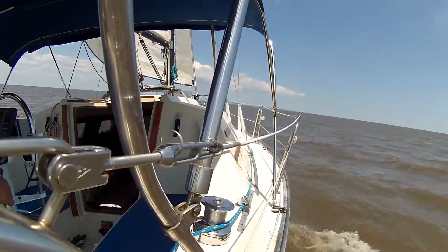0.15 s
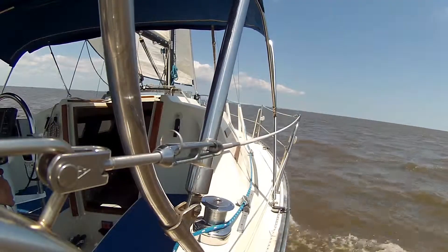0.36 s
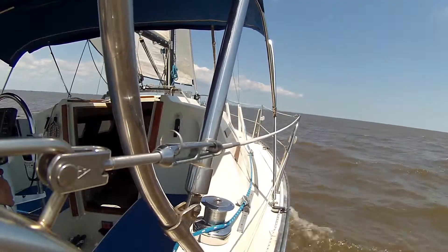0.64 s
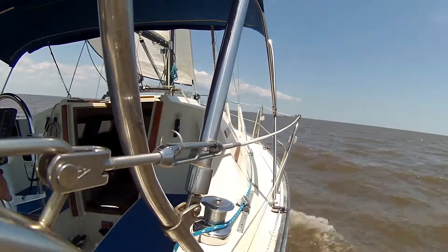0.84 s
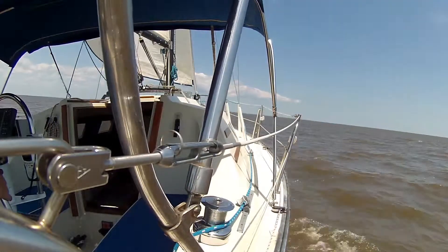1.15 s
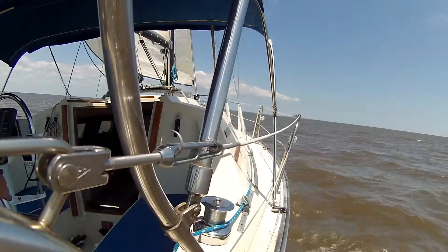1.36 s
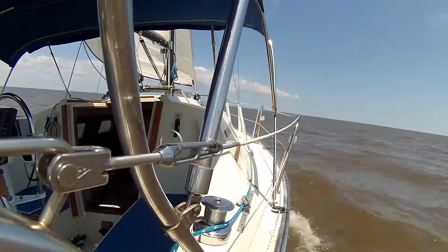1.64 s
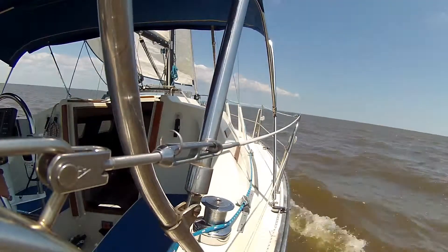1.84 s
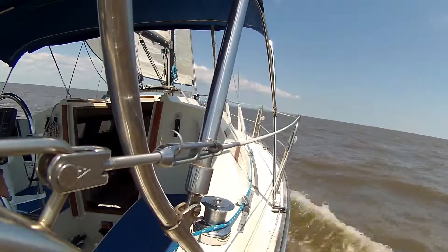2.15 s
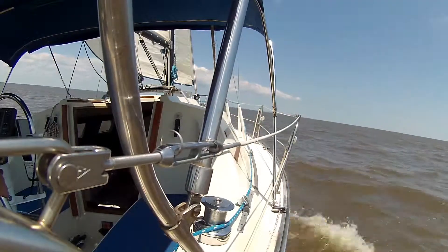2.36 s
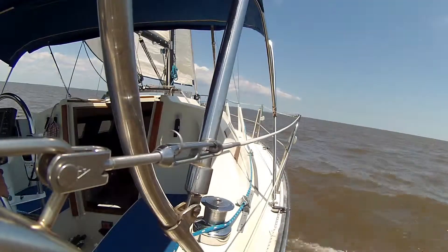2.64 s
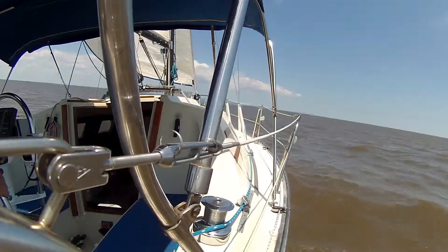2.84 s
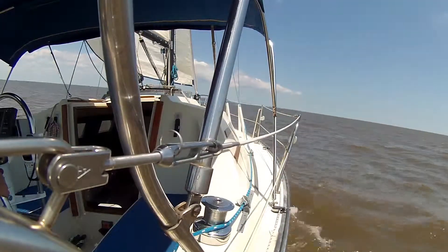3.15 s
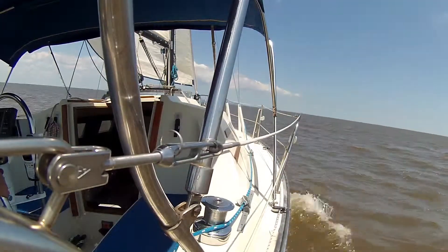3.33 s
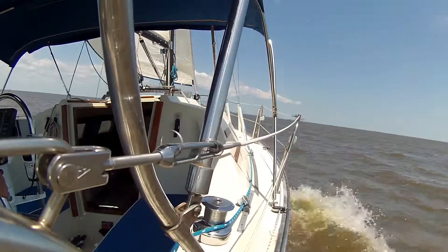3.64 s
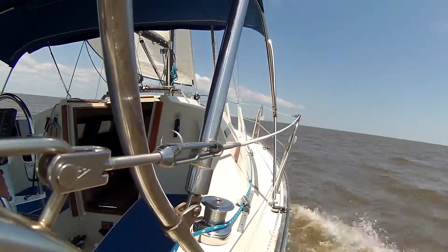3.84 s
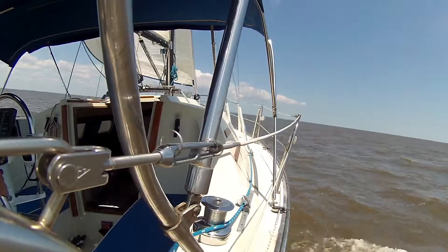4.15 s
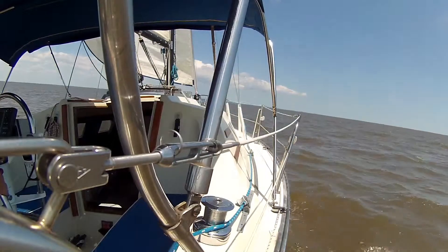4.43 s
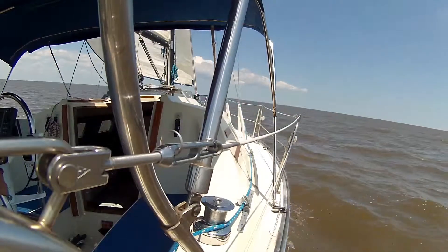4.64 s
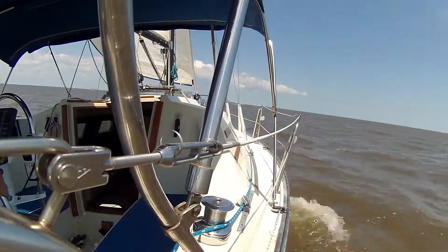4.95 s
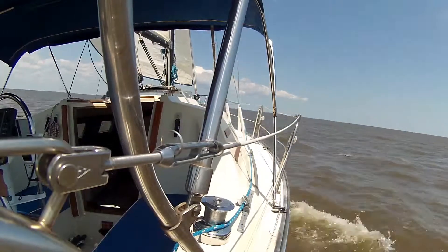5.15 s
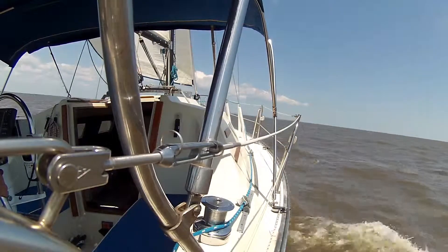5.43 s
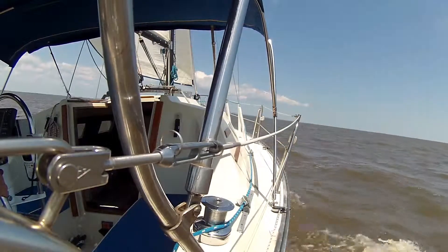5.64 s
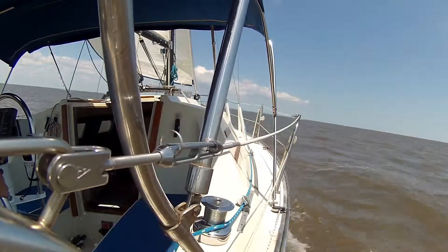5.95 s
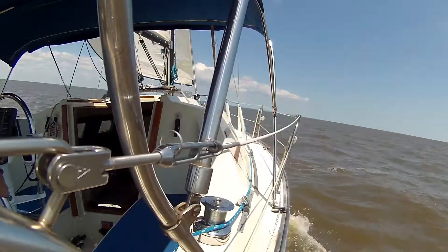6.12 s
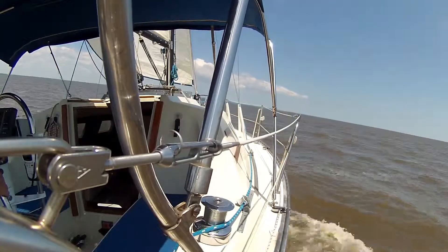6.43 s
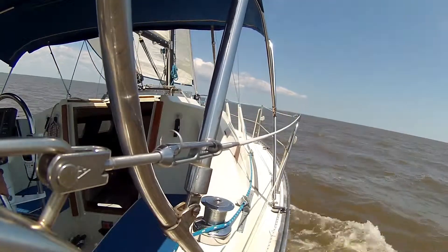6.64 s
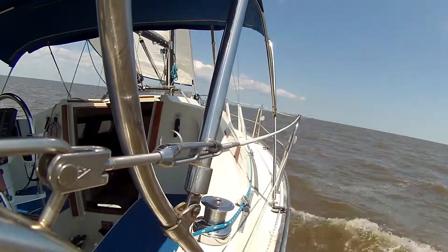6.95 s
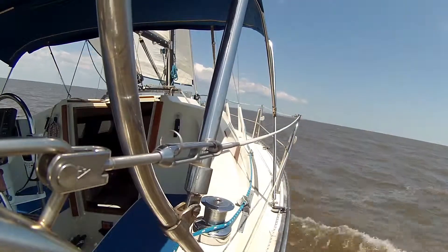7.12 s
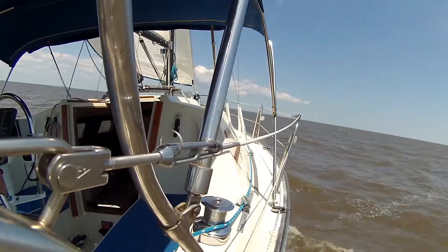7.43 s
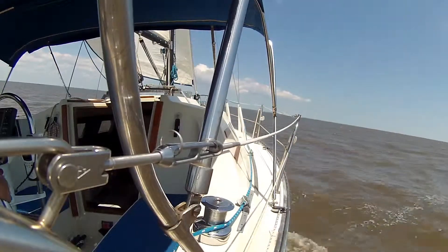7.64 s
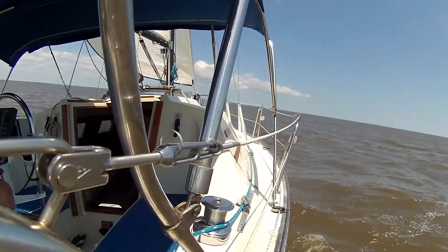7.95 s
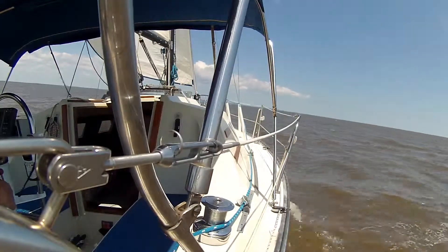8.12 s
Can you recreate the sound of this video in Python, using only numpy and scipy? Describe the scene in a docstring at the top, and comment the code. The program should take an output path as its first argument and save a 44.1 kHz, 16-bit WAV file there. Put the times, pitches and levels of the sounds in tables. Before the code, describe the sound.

Water rushes and gurgles along a sailboat's hull for about eight seconds, sounding hollow through a cased microphone on the stern rail. Bubbles plink throughout, light spray hisses, and a deep, lumpy rumble swells underneath, most strongly between 4 and 5 seconds. Choppy waves jolt the hull with dull thumps at about 0.6, 1.8, 4, 4.7 and 7.8 seconds, setting the rail and a wire ringing low. The rigging hums in gusts, strongest from 2 to 3.3 seconds and again from 5.6 to the end, with a higher hum joining at times. The wash surges with splashes around 2.5, 3.9 and 5.4 seconds, and two waves slap the hull near 7 seconds with a burst of bubbling. One brief, faint high squeak comes at 2.4 seconds, and a few drops tick close by over a thin steady hiss.

```python
"""Water rushes and gurgles along a heeling sailboat, heard from a cased microphone on the stern rail.
The wash and its bubbles ring the rail and case, spray hisses, and a deep, lumpy rumble swells beneath.
Choppy waves jolt, thump and later slap the hull; a stay rings with the jolts and hums in the gusts.
There is one brief high squeak, and a few drops tick close by.
The one microphone feeds two channels, each with its own hiss."""
import sys
import numpy as np
from scipy import signal
from scipy.fft import rfft, irfft
from scipy.io import wavfile

SR = 44100
rng = np.random.default_rng(int(sys.argv[2]) if len(sys.argv) > 2 else 0)


def wav_out(sig):
    """Save sig, one row per channel (or a flat mono array), as 16-bit PCM at SR to the path in sys.argv[1]."""
    wavfile.write(sys.argv[1], SR, np.round(np.clip(np.atleast_2d(sig).T, -1, 1) * 32767).astype(np.int16))


N = 365148

# steady flow along the hull: t/s, low gurgle/dB, high rush/dB, spray/dB
FLOW = [(0, -52, -51, -68), (.6, -51, -52.5, -70), (1.05, -50.5, -53, -70), (1.45, -53, -57, -69.5),
        (1.65, -55, -53, -69), (2.1, -55, -53, -70), (2.9, -54, -55, -72), (3.4, -53, -52.5, -70),
        (4.05, -50, -51, -67), (4.4, -52.5, -53.5, -71), (5.0, -53, -51.5, -70), (5.7, -52, -53, -68),
        (6.2, -55, -53.5, -68), (6.75, -54, -51, -69), (7.2, -54, -49.5, -70), (7.45, -54, -52.5, -70),
        (7.85, -53, -56.5, -72), (8.28, -53, -55, -73)]
# water lapping low on the hull: peak t/s, gurgle/dB
LAPS = [(.25, -46.5), (.34, -47.5), (.6, -47), (.91, -47), (1.18, -47), (1.29, -47.5), (1.38, -47.5),
        (1.77, -47), (2.74, -49), (3.48, -48), (3.74, -45.5), (3.89, -45), (4.47, -49.5), (4.54, -49),
        (5.09, -48), (5.19, -44), (5.28, -43), (5.4, -43), (5.51, -47.5), (5.58, -47), (5.63, -45),
        (5.76, -48.5), (5.9, -49.5), (6.27, -50), (6.8, -48), (6.97, -44), (7.03, -46), (7.39, -49),
        (7.54, -50), (7.86, -46), (8.09, -50), (8.26, -47)]
# the bow wave breaking: peak t/s, rush/dB, spray/dB, build-up over 20 dB/s
BOW_SPLASHES = [(.09, -50, -65, .3), (.24, -49.5, -66, .3), (.37, -48.5, -70, .1), (1.75, -49.5, -69, .1),
                (2.33, -50, -63.5, .6), (2.44, -50.5, -64, .5), (2.6, -49, -60, .6), (2.76, -52, -66, .5),
                (3.11, -54, -68, .2), (3.42, -53, -65, .6), (3.55, -50.5, -70, .1), (3.74, -48, -67, .25),
                (3.88, -44.5, -62, .6), (3.97, -48.5, -60, .5), (4.3, -51, -65.5, .6),
                (4.55, -50, -64.5, .12), (5.05, -51, -64, .3), (5.14, -49, -65, .3), (5.36, -46, -69, .4),
                (5.49, -51, -60.5, .2), (5.54, -52, -61, .1), (5.78, -49, -67, .4), (6.13, -53, -66, .3),
                (6.64, -52, -64, .7), (6.8, -47.5, -67, .2), (6.95, -49, -60, .1), (7.1, -47, -63, .12),
                (7.25, -48, -65, .4), (7.37, -49, -62, .4), (7.98, -56, -67, .25)]
# modes of the rail and microphone case: f/Hz, width/Hz, gain/dB
CASE_MODES = [(414, 109, 4.5), (621, 120, 0.5), (713, 59, 8.5), (768, 50, 1.5), (988, 262, -2.5),
              (1294, 189, 3.5), (1442, 325, -1.5), (1910, 370, -9.5), (2222, 185, -6), (2626, 360, -12),
              (3090, 136, -16), (3650, 1740, -25.5)]
# spectrum of the spray: f/Hz, relative density/dB
SPRAY_SPECTRUM = [(2500, -5), (3500, 0.5), (5500, -7), (6500, -2), (7100, -7), (8000, 3.5), (9000, -7.5),
                  (10500, -12), (12500, -37.5), (15000, -33)]
# waves jolting the hull, and each part's share: peak t/s, stay/dB, rail/dB, panels/dB
JOLTS = [(.07, -43.5, -56, -45), (.26, -54, -33, -38), (.38, -47, -33, -41), (.51, -24.5, -40, -44),
         (.6, -24.5, -32, -38), (.88, -48, -39, -41.5), (.94, -42, -35, -46), (1.08, -34, -33, -48),
         (1.17, -35, -32.5, -41), (1.38, -40, -32.5, -36.5), (1.57, -52, -38, -46), (1.7, -34, -36.5, -47),
         (1.8, -24.5, -34, -39.5), (1.96, -38, -33.5, -45), (2.21, -50, -37, -49), (2.6, -50, -42, -48),
         (2.9, -50, -36.5, -48), (3.0, -50, -38, -48), (3.2, -50, -35.5, -47), (3.29, -48, -34, -47),
         (3.36, -36, -34.5, -47), (3.6, -35, -43, -47), (3.71, -52, -37.5, -47), (3.85, -41, -37, -44),
         (4.01, -36, -29.5, -42.5), (4.15, -32.5, -34, -42.5), (4.44, -39, -33, -46), (4.72, -34, -36, -36),
         (4.99, -44, -40.5, -45), (5.12, -44, -43, -44), (5.26, -44, -40, -43.5), (5.38, -50, -42.5, -43),
         (5.53, -45, -52, -43.5), (5.72, -50, -39, -43), (5.9, -50, -47, -44), (6.11, -50, -37, -47),
         (6.48, -50, -39, -48), (6.64, -34, -44, -46), (6.73, -44, -45, -40), (6.94, -50, -44, -37),
         (7.12, -50, -34.5, -45), (7.22, -50, -37, -44), (7.5, -50, -45, -44), (7.82, -50, -43, -41),
         (7.96, -36.5, -40, -47), (8.11, -31, -41, -49), (8.23, -40, -52, -45.5)]
# the hull shaking between jolts, heard in the rail: t/s, level/dB
HULL_SHAKE = [(0, -52), (.4, -42), (.8, -46), (.95, -38), (1.4, -39), (1.5, -43), (1.75, -39), (2.2, -43),
              (2.7, -50), (3.0, -41), (3.4, -39), (3.6, -45), (4.7, -44), (4.9, -52), (5.6, -53),
              (6.3, -47), (7.6, -46), (8.28, -52)]
# swells of deep rumble: peak t/s, level/dB
RUMBLE_SWELLS = [(.23, -39), (.44, -45), (.6, -38), (1.2, -44), (1.71, -44), (1.8, -37), (1.98, -44.5),
                 (3.81, -39), (4.17, -33), (4.54, -40), (4.72, -34), (5.07, -41), (5.7, -41), (6.16, -46),
                 (6.52, -44), (6.73, -44), (7.5, -44), (7.77, -46), (8.21, -39)]
# spectrum of the rumble: f/Hz, relative density/dB
RUMBLE_SPECTRUM = [(20, -17), (32, -18), (48, 1.5), (65, -5.5), (100, -3.5), (125, -12), (160, -12)]
# spectrum of the hull panels: f/Hz, relative density/dB
PANEL_SPECTRUM = [(90, -47), (150, 2.5), (190, -0.5), (250, 3), (300, -4), (335, -3), (355, -26)]
# single bubbles and drips: t/s, level/dB, f/Hz, t60/s
PLINKS = [(.092, -38, 694, 0.067), (.34, -37, 440, .06), (.488, -34, 773, 0.075), (.56, -38, 456, 0.09),
          (.636, -32, 447, 0.039), (.913, -32, 720, 0.047), (1.15, -36, 725, .1), (1.276, -34, 705, 0.051),
          (1.369, -37, 482, 0.039), (1.755, -35, 722, 0.11), (1.99, -43, 516, 0.044),
          (1.877, -35, 728, 0.041), (2.075, -43, 950, 0.065), (2.5, -38, 453, 0.066),
          (2.745, -26.5, 720, 0.038), (3.725, -27.5, 715, 0.072), (3.782, -27.5, 1047, 0.041),
          (3.86, -32, 1148, 0.05), (4.429, -34, 701, 0.065), (5.305, -58, 2300, 0.092),
          (5.33, -40, 2330, 0.093), (5.332, -28.5, 1285, 0.074), (5.35, -36, 2130, 0.043),
          (5.358, -29, 1275, 0.053), (5.385, -35, 602, 0.14), (5.387, -34.5, 430, 0.17),
          (5.571, -28.5, 1284, 0.062), (5.63, -30.5, 423, 0.072), (6.06, -36.5, 933, .06),
          (6.268, -39.5, 1301, 0.082), (6.92, -33, 1008, 0.093), (6.933, -44, 2230, .1),
          (6.939, -26.5, 1331, 0.063), (6.975, -48, 2310, .1), (7.087, -33.5, 2257, 0.09),
          (7.095, -25, 1330, .06), (7.115, -30, 1030, 0.082), (7.4, -35.5, 450, .07),
          (7.569, -35.5, 431, 0.076), (7.656, -33, 706, 0.045), (7.856, -40, 745, 0.062),
          (8.085, -29.5, 719, 0.058), (8.09, -36.5, 481, 0.065)]
# dull thumps through the hull: t/s, level/dB, f/Hz, t60/s
HULL_THUMPS = [(0.429, -29, 169, 0.12), (0.575, -24.5, 254, 0.17), (1.371, -32, 177, 0.095),
               (1.785, -22, 169.5, 0.14), (1.995, -30.5, 234.9, 0.16), (2.499, -51, 172, 0.17),
               (3.985, -19.5, 220.7, 0.11), (4.139, -46, 172, 0.15), (4.661, -29.5, 239, 0.1),
               (4.708, -23.5, 172.4, 0.11), (5.264, -30, 176, 0.12), (7.809, -28.5, 206.6, 0.12),
               (8.082, -40, 249.6, 0.14)]
# the higher hum of the wires, one table a gust: t/s, f/Hz, level/dB
HIGH_HUM_GUSTS = [
    [(0.85, 225, -62), (1.012, 219.8, -53), (1.074, 243, -44.5), (1.152, 226, -46.5), (1.308, 223.4, -53),
     (1.35, 231.6, -36.5)],
    [(2.2, 228.7, -65), (2.258, 242, -43), (2.388, 259.1, -49.5), (2.6, 264, -43), (2.85, 252.3, -45),
     (2.9, 248, -42), (3.216, 250.6, -42), (3.29, 249.4, -46), (3.45, 244.5, -62)],
    [(7.38, 240.6, -58), (7.412, 257, -48), (7.478, 248.0, -37), (7.528, 259.9, -45), (7.698, 243.2, -48.5),
     (7.75, 250, -62)],
    [(7.85, 238.8, -45), (7.984, 262.3, -45.5), (8.044, 260.8, -40), (8.07, 263, -49),
     (8.174, 244.6, -41.5), (8.254, 246.9, -36), (8.28, 244.6, -43)],
]
# the low hum of the stay, one table a gust: t/s, f/Hz, level/dB
LOW_HUM_GUSTS = [
    [(2.0, 128, -47), (2.12, 123.9, -33), (2.21, 125.5, -36), (2.26, 123, -27), (2.33, 124.8, -32),
     (2.6, 131.6, -25), (2.67, 132, -30), (2.84, 128.4, -27), (2.87, 128.5, -37), (2.95, 124.1, -31),
     (3.16, 124.4, -33.5), (3.23, 128, -30), (3.27, 132, -45)],
    [(5.58, 124, -58), (5.65, 126.8, -32.5), (5.72, 130.8, -28.5), (6.3, 131.2, -40.5), (6.48, 131, -37.5),
     (6.55, 133, -48)],
    [(6.8, 133, -52), (6.87, 130.5, -29.5), (6.97, 129.9, -27), (7.29, 130.2, -33), (7.4, 131.3, -30.5),
     (7.56, 131.2, -42.5), (7.63, 130.7, -35.5), (7.84, 131.7, -37.5), (7.91, 133, -50)],
]
# one high squeak: start t/s, end t/s, start f/Hz, end f/Hz, level/dB
SQUEAK = (2.409, 2.459, 7655, 7715, -53.5)
# drops landing near the microphone: t/s, level/dB, f/Hz, t60/s
NEAR_DROPS = [(2.9858, -51.5, 8200, 0.019), (3.8353, -51, 8340, 0.023), (5.7144, -50, 5940, 0.018),
              (6.6283, -52, 8160, 0.02), (7.5712, -51, 8280, 0.022)]
# waves slapping the hull: t/s, drive to the modes/dB, t60/s
HULL_SLAPS = [(6.917, -43, .45), (7.092, -39, .28)]


def from_db(db):
    """Gain of a level in dB."""
    return 10 ** (np.asarray(db) / 20)


def rms_one(x):
    """The signal scaled to rms 1."""
    return x / np.sqrt(np.mean(x ** 2) + 1e-20)


def in_time(rows):
    """Each column after the time column, interpolated sample by sample."""
    times, *columns = np.transpose(rows)
    return [np.interp(np.arange(N) / SR, times, column) for column in columns]


def drift(rate_hz):
    """Slow random wander of rms 1, changing about rate_hz times a second."""
    hop, settle = 40, 2000   # samples a step, steps discarded
    pole = np.exp(-2 * np.pi * rate_hz * hop / SR)
    white = rng.standard_normal(N // hop + settle + 2)
    slow = signal.lfilter([1], [1, -2 * pole, pole * pole], white)[settle:]
    return np.interp(np.arange(N) / hop, np.arange(len(slow)), rms_one(slow))


def swells(rest_db, times, peak_db, rise_s, fall_s):
    """Level in dB, peaking above rest at each event; rise_s and fall_s are the times for 20 dB."""
    t = np.arange(0, N / SR, .002)
    since_peak = t[:, None] - times
    event_db = peak_db - 20 * np.maximum(-since_peak / rise_s, since_peak / fall_s)
    return np.maximum(rest_db, np.interp(np.arange(N) / SR, t, event_db.max(axis=1)))


def resonance(x, hz, width_hz):
    """Two-pole peak of gain 1."""
    r = np.exp(-np.pi * width_hz / SR)
    poles = [1, -2 * r * np.cos(2 * np.pi * hz / SR), r * r]
    return signal.lfilter(np.array([1, 0, -1]) * (1 - r * r) / 2, poles, x)


def coloured(spectrum):
    """Noise shaped to a spectrum table; rms 1."""
    hz, db = np.transpose(spectrum)
    white = rfft(rng.standard_normal(N))
    bin_hz = np.maximum(np.arange(len(white)) * SR / N, 1)
    shape_db = np.interp(np.log(bin_hz), np.log(hz), db, left=-60, right=-60)
    return rms_one(irfft(white * from_db(shape_db), N))


def grains(per_s, spread_db):
    """Random clicks, most small and a few large; rms 1."""
    sizes = from_db(spread_db * np.minimum(rng.exponential(1, N), 5)) * rng.choice([-1, 1], N)
    return rms_one(sizes * (rng.random(N) < per_s / SR))


def hum(hz, level_db, waver_hz):
    """A nearly clean tone that wavers a little in pitch and level."""
    phase = 2 * np.pi * np.cumsum(hz + waver_hz * drift(9.8)) / SR
    return np.sqrt(2) * from_db(level_db + 1.16 * drift(7.8)) * np.sin(phase)


def rings(rows, rise_s):
    """One damped sine a row; the soft onset keeps its peak below the listed level."""
    out, t = np.zeros(N + SR), np.arange(SR // 2) / SR
    onset = 1 - np.exp(-t / rise_s)
    for start_s, level_db, hz, t60 in rows:
        i = round(start_s * SR)
        out[i:i + len(t)] += from_db(level_db - 60 * t / t60) * onset * np.sin(2 * np.pi * hz * t)
    return out[:N]


def water():
    """Flow along the hull: laps lift the gurgle, the breaking bow wave lifts rush and spray."""
    gurgle_db, rush_db, spray_db = in_time(FLOW)
    times, rush_peak_db, spray_peak_db, build_s = np.transpose(BOW_SPLASHES)
    gurgle_db = swells(gurgle_db + 1.5 * drift(18), *np.transpose(LAPS), rise_s=.08, fall_s=.12)
    rush_db = swells(rush_db + .7 * drift(14), times, rush_peak_db, build_s, fall_s=.3)
    spray_db = swells(spray_db + .7 * drift(8), times, spray_peak_db, build_s, fall_s=.25)
    return wash(gurgle_db, rush_db, spray_db) + spray(spray_db)


def wash(gurgle_db, rush_db, spray_db):
    """Rush and bursting bubbles drive each mode of rail and case separately; all surge together."""
    gurgle_below_hz, bright_above_hz, slap_low_hz, calm_spray_db = 900, 1400, 680, -69
    out, surge, slap = 0, drift(4.1), slap_envelope()
    for hz, width_hz, mode_db in CASE_MODES:
        lumpiness = min(1, (1500 / hz) ** .69)   # small high bubbles blend into a smooth rush
        drive = rng.standard_normal(N) + .62 * lumpiness * grains(per_s=70, spread_db=3)
        drive *= from_db(lumpiness * (.7 * surge + 1.42 * drift(11.7)))
        mode = resonance(resonance(drive, hz, width_hz), hz, width_hz)   # twice: deep valleys
        slap_share = (min(1, hz / slap_low_hz) * lumpiness) ** 1.8   # most in the middle modes
        bright_db = (hz > bright_above_hz) * lumpiness * .5 * (spray_db - calm_spray_db)
        flow_db = gurgle_db if hz < gurgle_below_hz else rush_db + bright_db
        gain = (from_db(flow_db) + slap * slap_share) * from_db(mode_db)
        out += gain * rms_one(mode) * np.sqrt(width_hz / 1000)
    return out


def spray(spray_db):
    """Fine droplets: bright noise that patters a little."""
    patter = from_db(1.3 * drift(26) + .95 * drift(45))
    return from_db(spray_db) * patter * coloured(SPRAY_SPECTRUM)


def stay():
    """The wire rings faintly throughout and swells when waves jolt the hull."""
    times, peak_db, _, _ = np.transpose(JOLTS)
    level_db = swells(-52 + 3 * drift(6), times, peak_db, rise_s=.09, fall_s=.09)
    return hum(hz=133.5, level_db=level_db, waver_hz=1.5)


def rail():
    """The lowest mode of the rail under the microphone clamp, kept ringing by the shaking hull."""
    times, _, peak_db, _ = np.transpose(JOLTS)
    rest_db = in_time(HULL_SHAKE)[0] + 2 * drift(9)
    level_db = swells(rest_db, times, peak_db, rise_s=.1, fall_s=.15)
    return hum(hz=147.6, level_db=level_db, waver_hz=2.52)


def rumble():
    """Swells of deep, lumpy rumble, often as waves jolt the hull."""
    level_db = swells(-49.5 + 1.5 * drift(4), *np.transpose(RUMBLE_SWELLS), rise_s=.15, fall_s=.17)
    return from_db(level_db + .53 * drift(7.6)) * coloured(RUMBLE_SPECTRUM)


def hull_panels():
    """The panels drum dully as waves jolt the hull."""
    times, _, _, peak_db = np.transpose(JOLTS)
    level_db = swells(-48 + 1.5 * drift(6), times, peak_db, rise_s=.15, fall_s=.15)
    return from_db(level_db + 2.2 * drift(27)) * coloured(PANEL_SPECTRUM)


def plinks():
    """Single bubbles and drips ring briefly above the wash."""
    return rings(PLINKS, rise_s=.003)


def hull_thumps():
    """Waves strike the hull, which answers with a low, quickly damped note."""
    return rings(HULL_THUMPS, rise_s=.005)


def gust_hum(gusts, waver_hz):
    """In each gust, vortices shed behind a wire lock to it and make it hum."""
    out, t, fade_s = 0, np.arange(N) / SR, .05
    for gust in gusts:
        start_s, end_s = gust[0][0], gust[-1][0] + fade_s
        gate = np.clip(np.minimum(t - start_s, end_s - t) / fade_s, 0, 1)
        out += gate * hum(*in_time(gust), waver_hz)
    return out


def squeak():
    """A high slip tone that starts and stops abruptly, rising slightly."""
    start_s, end_s, start_hz, end_hz, level_db = SQUEAK
    t, fade_s = np.arange(N) / SR, .002
    gate = np.clip(np.minimum(t - start_s, end_s - t) / fade_s, 0, 1)
    hz = np.interp(t, [start_s, end_s], [start_hz, end_hz])
    return from_db(level_db) * gate * np.sin(2 * np.pi * np.cumsum(hz) / SR)


def near_drops():
    """Drops land close to the microphone, each a tiny high tick."""
    return rings(NEAR_DROPS, rise_s=.0008)


def slap_envelope():
    """Waves slapping the hull lift the wash suddenly, then die away."""
    out, t = np.zeros(N), np.arange(N) / SR
    for start_s, drive_db, t60 in HULL_SLAPS:
        out += (t > start_s) * from_db(drive_db - 60 * np.maximum(t - start_s, 0) / t60)
    return out


def scene():
    """Everything reaches the one microphone on the stern rail, alike in both channels."""
    mono = water() + stay()
    mono += gust_hum(LOW_HUM_GUSTS, waver_hz=1.14) + gust_hum(HIGH_HUM_GUSTS, waver_hz=2.35)
    mono += rail() + rumble() + hull_panels()
    mono += plinks() + hull_thumps() + squeak() + near_drops()
    return np.tile(mono, (2, 1))


def record(dry):
    """The preamp hisses in both channels alike, each adds its own thin hiss; the top is cut."""
    hiss_low_hz, hiss_dull_hz, cutoff_hz = 3020, 15300, 15270
    high_pass = signal.butter(6, hiss_low_hz, "high", fs=SR, output="sos")
    channel_hiss = from_db(-65.5) * signal.sosfilt(high_pass, rng.standard_normal((2, N)))
    preamp_hiss = from_db(-66.5) * rng.standard_normal(N)
    hiss = signal.lfilter(*signal.butter(1, hiss_dull_hz, fs=SR), channel_hiss + preamp_hiss)
    low_pass = signal.ellip(14, .5, 70, cutoff_hz, fs=SR, output="sos")
    return signal.sosfilt(low_pass, dry + hiss)


dry = scene()
out = record(dry)
wav_out(out)
```